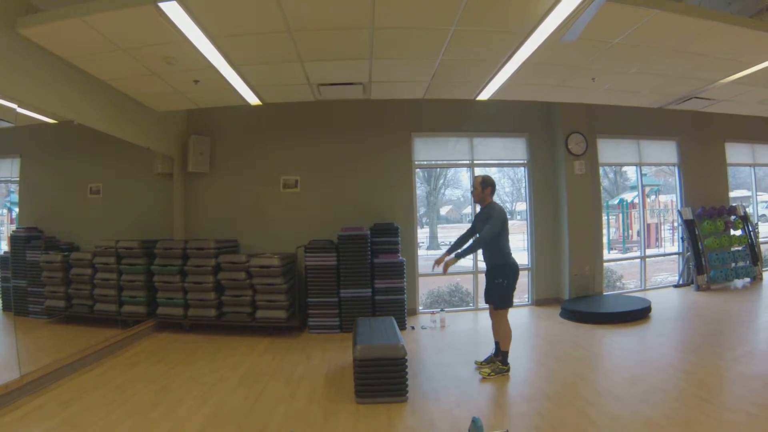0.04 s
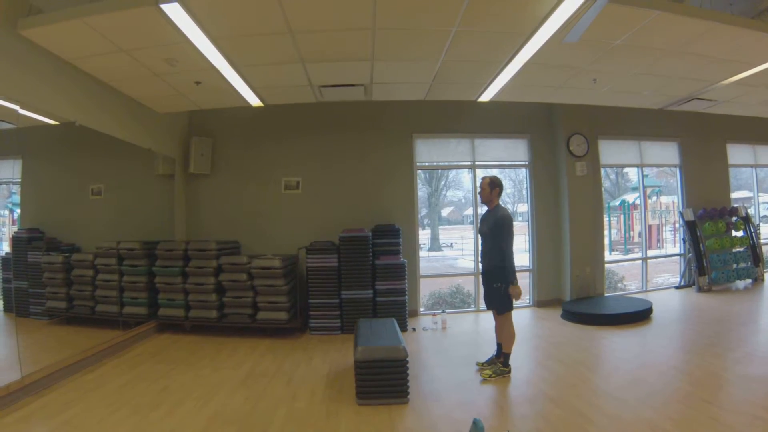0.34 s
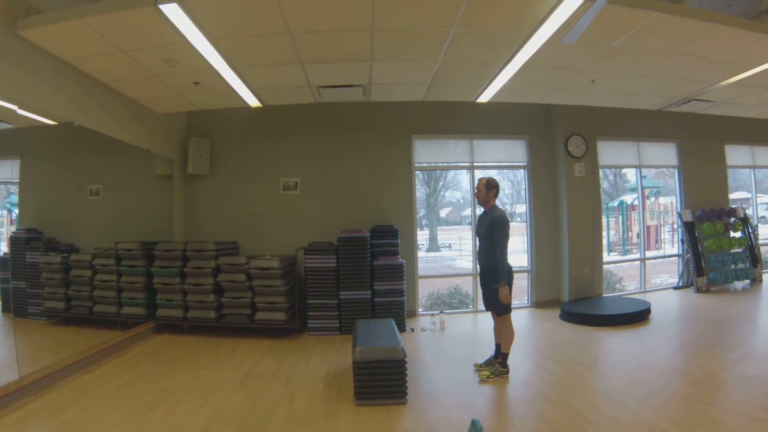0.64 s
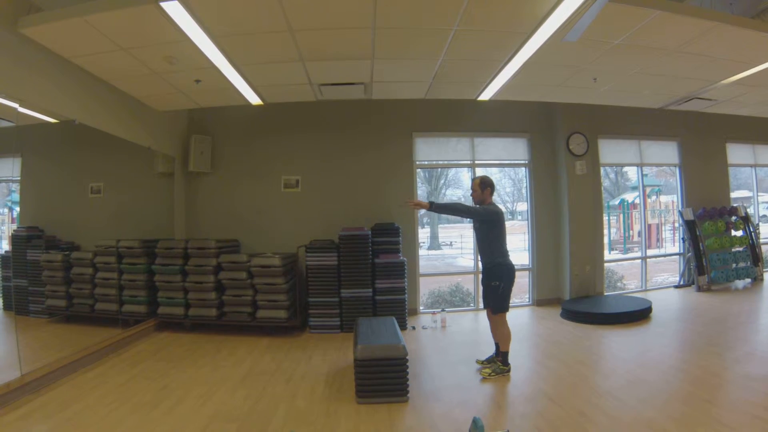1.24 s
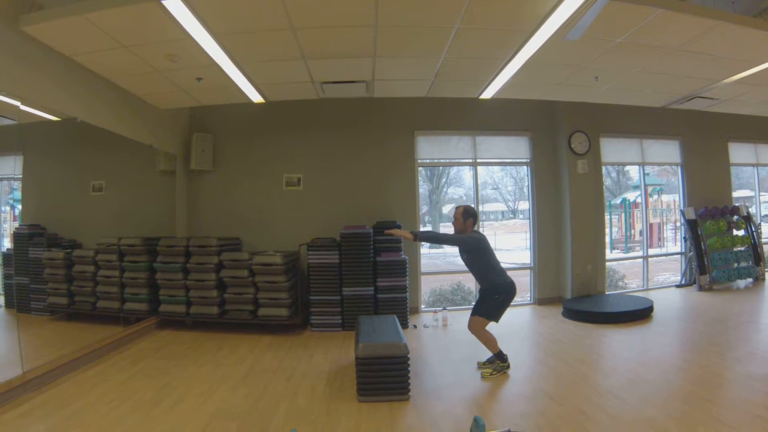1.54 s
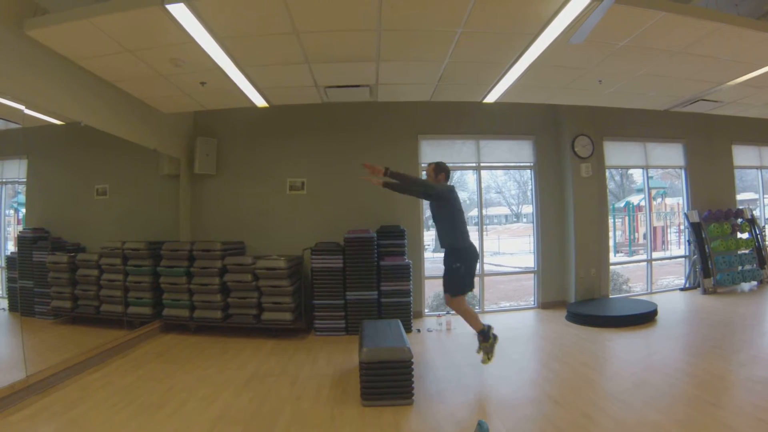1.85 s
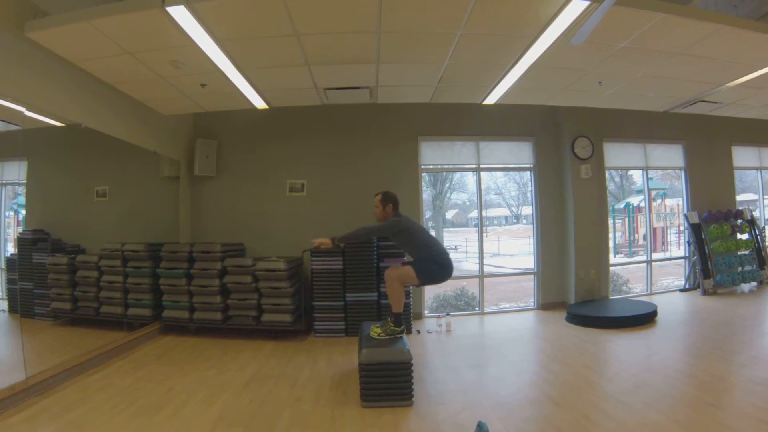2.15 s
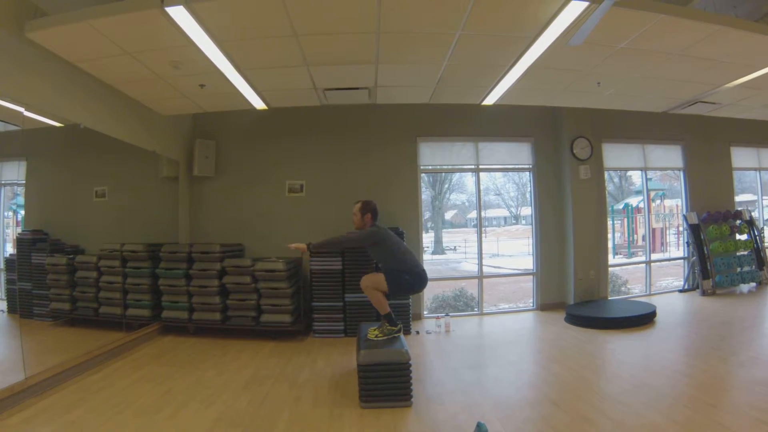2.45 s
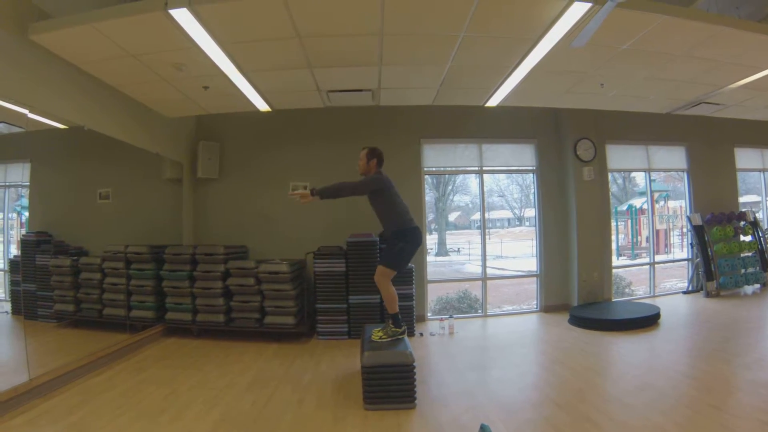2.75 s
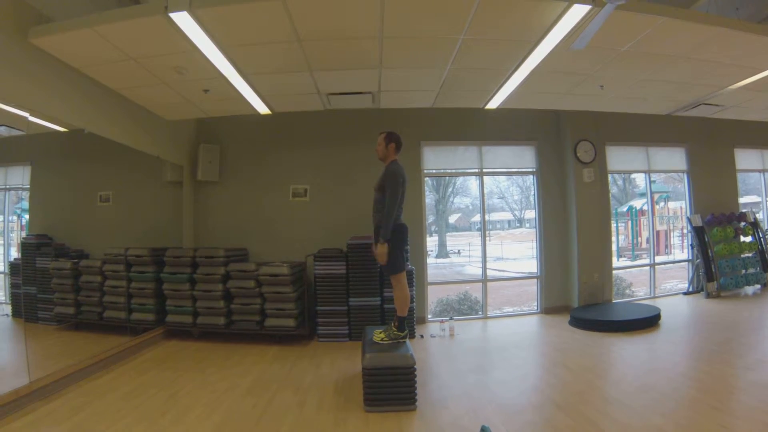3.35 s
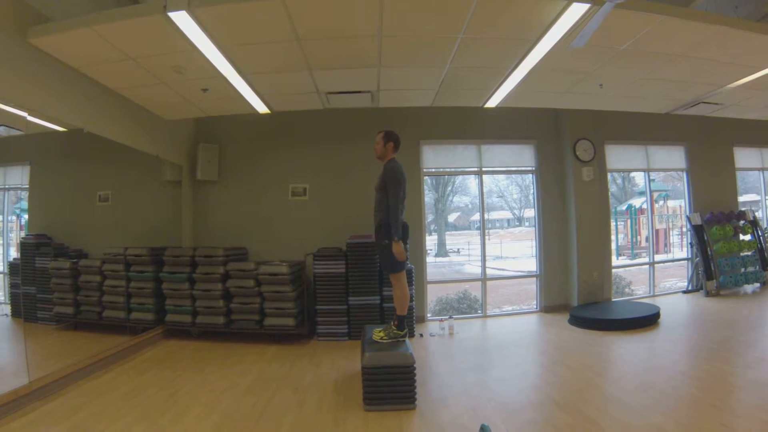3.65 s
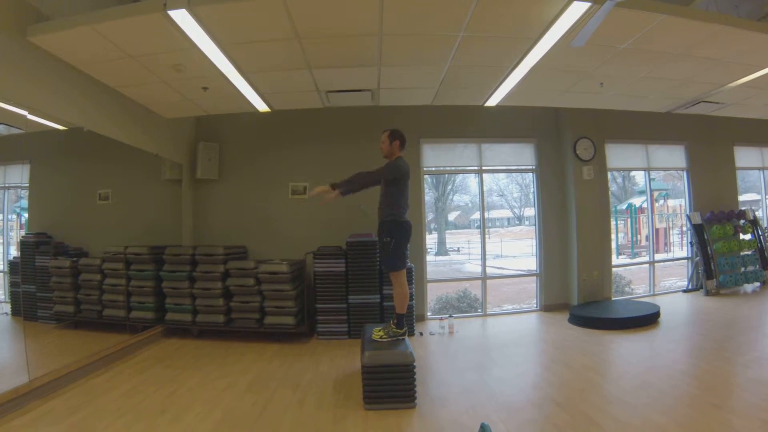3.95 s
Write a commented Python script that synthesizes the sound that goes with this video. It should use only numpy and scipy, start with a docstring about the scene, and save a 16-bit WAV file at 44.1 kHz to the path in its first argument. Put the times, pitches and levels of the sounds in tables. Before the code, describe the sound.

Feet land on a stack of plastic steps with one hollow, clattering thud, just after rubber soles scuff off the floor. Ventilation rumbles throughout, and the gym rings briefly around a microphone a few metres away.

```python
"""First comes the steady rumble of a studio's ventilation, with a faint squeak and a rustle of clothes.
Then a person jumps from the wooden gym floor onto a stack of plastic step platforms.
The rubber soles tick and scuff at take-off. Toes, forefeet and heels thump the hollow deck
and make the plastic risers under it chatter. The room rings briefly, and a few more faint
rustles and thin squeaks follow."""
import sys
import numpy as np
from scipy import signal
from scipy.fft import rfft, irfft
from scipy.io import wavfile

SR = 44100
rng = np.random.default_rng(int(sys.argv[2]) if len(sys.argv) > 2 else 0)


def inscribe(sig):
    """Save sig as 16-bit PCM at rate SR to the path in sys.argv[1].

    A 1-D sig is mono; a 2-D sig holds one channel per row.
    Samples are clipped to [-1, 1] before scaling.
    """
    pcm = np.round(np.clip(np.atleast_2d(sig).T, -1, 1) * 32767)
    wavfile.write(sys.argv[1], SR, pcm.astype(np.int16))


N = 176400
TIME = np.arange(N) / SR

# The feet strike the deck, toes first and heels last. A higher hardness makes a sharper thump.
# (time [s], relative thump level [dB], hardness [Hz], relative chatter level [dB], brightness [Hz])
FOOT_BLOWS = [(2.1842, -8.5, 1490, -4.5, 1800), (2.1918, -5.5, 523, -14, 2800),
              (2.194, -12.5, 1500, -1.5, 3470), (2.1998, 2, 490, -5.5, 3500), (2.2066, -1, 326, -2, 4500),
              (2.2121, -7, 900, -2.5, 8000), (2.2218, -12, 800, -6, 3000), (2.231, -9, 894, -2, 2000),
              (2.2432, -8.5, 696, -12, 2000), (2.266, -2, 235, -15, 2500), (2.2805, -8.5, 370, -7.5, 2500),
              (2.2961, -3.5, 300, -11, 2000), (2.342, -20, 260, -14, 1800)]


def from_db(db):
    """Turn decibels into a number to multiply a sound by."""
    return 10 ** (np.asarray(db) / 20)


def rms_one(x):
    """Scale a sound so that its average strength (rms) is 1."""
    return x / np.sqrt(np.mean(x ** 2) + 1e-20)


def at_hz(points, hz):
    """Read between the rows of a frequency table, giving every octave equal room."""
    frequencies, values = np.transpose(points)
    return np.interp(np.log(np.maximum(hz, 1)), np.log(frequencies), values)


def convolve(x, response):
    """Pass a sound through something whose answer to a single click is `response`."""
    return signal.fftconvolve(x, response)[:N]


def coloured(x, spectrum, size=32768):
    """Change the balance of bass and treble to follow a table; only the table's shape counts."""
    gains = from_db(at_hz(spectrum, np.fft.rfftfreq(size, 1 / SR)))
    cepstrum = irfft(np.log(gains))
    # Folding makes the filter ring only after a click, never before it (minimum phase).
    fold = np.r_[1, np.full(size // 2 - 1, 2), 1, np.zeros(size // 2 - 1)]
    response = irfft(np.exp(rfft(cepstrum * fold)))
    return convolve(x, response / np.linalg.norm(response))


def low_pass(x, hz, order=1):
    """Gently turn down everything above hz."""
    sections = signal.butter(order, min(hz, SR / 2 - 1000), fs=SR, output="sos")
    return signal.sosfilt(sections, x + 1e-18)


def clicks(times, gains):
    """Single clicks at the given moments."""
    out = np.zeros(N)
    np.add.at(out, (np.asarray(times) * SR).astype(int), gains)
    return out


def ring(x, hz, fade_s):
    """Each click starts a pure tone that fades by 60 dB in fade_s."""
    decay = from_db(-60 / (fade_s * SR))
    angle = 2 * np.pi * hz / SR
    return signal.lfilter([0, np.sin(angle)], [1, -2 * decay * np.cos(angle), decay * decay], x + 1e-18)


def grains(per_s, spread_db=-3):
    """Tiny contacts of uneven size at random moments."""
    sizes = from_db(spread_db * np.minimum(rng.exponential(1, N), np.pi))
    signs = rng.choice([-1, 1], N)
    touches = rng.random(N) < per_s / SR
    return rms_one(sizes * signs * touches)


def burst(start, rise_s, fall_db_per_s):
    """A loudness curve that rises in a straight line, then dies away."""
    age = TIME - start
    return np.clip(age / rise_s, 0, 1) * from_db(-fall_db_per_s * np.clip(age - rise_s, 0, 1))


def swell(centre_s, length_s):
    """A smooth rise and fall around a moment."""
    return np.exp(-2 * ((TIME - centre_s) / length_s) ** 2)


def waver(depth, rate_hz):
    """A value that wanders at random around 1, mostly slower than rate_hz."""
    return 1 + depth * rms_one(low_pass(rng.standard_normal(N), rate_hz, order=2))


def ventilation(air_db=-32.5):
    """Air rumbles and hisses steadily in the ducts, with the wavering hum of a fan motor."""
    # Tone colour of the moving air: (frequency [Hz], relative level [dB])
    air_colour = [(6, -14), (14, -10.5), (25, 1), (48, -4), (72, -2), (92, -9), (135, -11.5), (250, -21),
                  (460, -30), (660, -31.5), (1000, -38.5), (2000, -46.5), (4000, -52), (8000, -60),
                  (12000, -63), (15000, -64)]
    # Tones of the fan motor: (frequency [Hz], average level [dB])
    motor_tones = [(59.2, -41.5), (120, -50.5)]
    out = from_db(air_db) * rms_one(coloured(rng.standard_normal(N), air_colour))
    for hz, db in motor_tones:
        strength = waver(depth=0.52, rate_hz=0.95)
        tone = np.sin(2 * np.pi * (hz * TIME + rng.random()))
        out = out + from_db(db) * rms_one(strength * tone)
    return out


def studio_echo(x, bands=24, gap_s=0.0059, build_s=0.0036):
    """The room's echoes blur into bands of noise that build up quickly and die, the treble first."""
    # How long the room rings: (frequency [Hz], time to fade by 60 dB [s])
    fade_times = [(70, 0.79), (150, 1.64), (300, 0.85), (700, 1), (2000, 0.93), (4500, 0.92), (8000, 0.58),
                  (14000, 0.23)]
    # How strong the echoes are: (frequency [Hz], level compared with the direct sound [dB])
    echo_levels = [(70, -2), (160, 1), (400, -0.5), (1000, -4), (3500, -5), (8000, -8), (14000, -13)]
    t = TIME[:SR * 3 // 2]
    edges = np.geomspace(40, 18000, bands + 1)
    noise = rng.standard_normal((2, len(t)))
    build_up = np.clip((t - gap_s) / build_s, 0, 1)
    response = 0
    for k, (low, high) in enumerate(zip(edges, edges[1:])):
        hz = np.sqrt(low * high)
        band = signal.sosfilt(signal.butter(2, [low, high], "band", fs=SR, output="sos"), noise[k % 2])
        tail = band * build_up * from_db(-60 * t / at_hz(fade_times, hz))
        band_share = np.sqrt(2 * (high - low) / SR)   # wider bands carry more of a click
        response = response + from_db(at_hz(echo_levels, hz)) * band_share * tail / np.linalg.norm(tail)
    return convolve(x, response)


def squeaks():
    """Short, faint, thin tones of slightly unsteady pitch."""
    # One row for each squeak: (middle time [s], length [s], pitch [Hz], level [dB])
    tones = [(.42, .085, 1610, -62), (2.96, .09, 9620, -79.5), (3.05, .1, 4452, -76.5)]
    unsteady_time = np.cumsum(waver(depth=0.0051, rate_hz=49.6)) / SR
    return sum(from_db(db) * swell(time, length) * rms_one(np.sin(2 * np.pi * hz * unsteady_time))
               for time, length, hz, db in tones)


def clothes():
    """Fabric rubs in fine grains with each quick movement."""
    # The jumper crouches, pushes off, tucks and straightens up: (middle time [s], length [s], level [dB])
    rustles = [(1.47, .14, -77), (1.72, .12, -80), (2.038, 0.14, -70.5), (2.76, .11, -78), (3.5, .13, -78),
               (3.76, .07, -75)]
    # Tone colour of the fabric: (frequency [Hz], relative level [dB])
    fabric_colour = [(500, -20), (2000, -3), (5000, 2), (9000, 5), (15000, 0)]
    rubbing = sum(from_db(db) * swell(time, length) for time, length, db in rustles)
    return coloured(rubbing * grains(per_s=1400), fabric_colour)


def soles(take_off_s=1.8378, tick_db=-29):
    """The toes leave the floor with a tick; rubber soles slip grittily at take-off and landing."""
    # Short slips of the soles: (time [s], level [dB], rise time [s], fading speed [dB/s])
    scuffs = [(1.846, -56.5, 0.003, 298), (2.1875, -53.5, .002, 300), (2.205, -44, 0.0053, 600),
              (2.263, -52, 0.013, 232)]
    # Tone colour of scuffing rubber: (frequency [Hz], relative level [dB])
    rubber_colour = [(500, -44), (2400, -7), (3500, 7.5), (6000, 3.5), (9000, -1.5), (13000, -9),
                     (16000, -14)]
    slipping = sum(from_db(db) * burst(time, rise, fall) for time, db, rise, fall in scuffs)
    tick = clicks([take_off_s], from_db(tick_db))
    return coloured(slipping * grains(per_s=3900) + tick, rubber_colour)


def riser_chatter(gain_db=-26.5, crack_db=-1):
    """Each blow cracks against the deck and rattles the plastic risers with its own brightness."""
    # Tone colour of the rattling plastic: (frequency [Hz], relative level [dB])
    plastic_colour = [(60, -26), (200, 4.5), (380, 5), (500, 0.5), (660, 4), (950, 1.5), (1250, -6.5),
                      (2000, -6.5), (2700, -9), (4000, -13.5), (8000, -19), (11500, -15.5), (15000, -22)]
    contacts = grains(per_s=2300)
    chatter = 0
    for time, _, _, db, brightness_hz in FOOT_BLOWS:
        crack = clicks([time], from_db(crack_db))
        rattle = np.roll(contacts, rng.integers(N)) * burst(time, rise_s=0.001, fall_db_per_s=642)
        chatter = chatter + from_db(db) * low_pass(crack + rattle, brightness_hz)
    return from_db(gain_db) * coloured(chatter, plastic_colour)


def deck_thumps(gain_db=-24, spread_db=4):
    """Each blow is a push, rounded by the softness of the contact, that rings the hollow stack."""
    # Short, damped tones that give the thumps their hollow sound:
    # (frequency [Hz], relative level [dB], time to fade by 60 dB [s])
    thump_tones = [(75, -18, 0.053), (128, -6, 0.051), (180, -1, 0.055), (239, 1, 0.056),
                   (297.6, -.5, 0.077), (368, 0, 0.081), (437, -9.5, 0.06), (610, -8.5, 0.075),
                   (712, -13, 0.098), (790, -16, 0.07), (960, -18, 0.06), (1470, -6, 0.057),
                   (1846, -13, 0.06), (2580, -12, .06)]
    pushes = np.array([low_pass(clicks([time], from_db(gain_db + db)), hardness_hz, order=2)
                       for time, db, hardness_hz, _, _ in FOOT_BLOWS])
    # Every blow feeds every tone by a different, random amount.
    shares = from_db(rng.normal(0, spread_db, (len(FOOT_BLOWS), len(thump_tones))))
    return sum(from_db(db) * ring(shares[:, k] @ pushes, hz, fade_s)
               for k, (hz, db, fade_s) in enumerate(thump_tones))


def scene():
    """The jump and its echo, heard from a few metres away over the background, in one channel."""
    air = ventilation()
    jump = deck_thumps() + riser_chatter() + soles() + clothes()
    return (air + squeaks() + jump + studio_echo(jump))[None]


def record(dry, cutoff_hz=15350):
    """Cut off the very highest treble steeply."""
    return signal.sosfilt(signal.ellip(12, .1, 90, cutoff_hz, fs=SR, output="sos"), dry)


dry = scene()
out = record(dry)
inscribe(out)
```